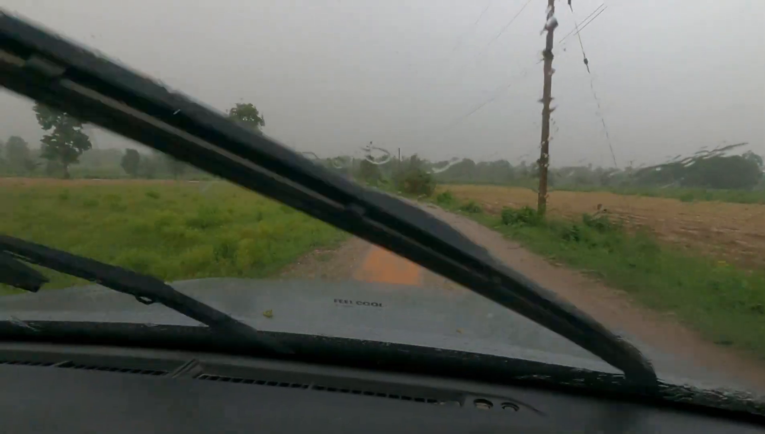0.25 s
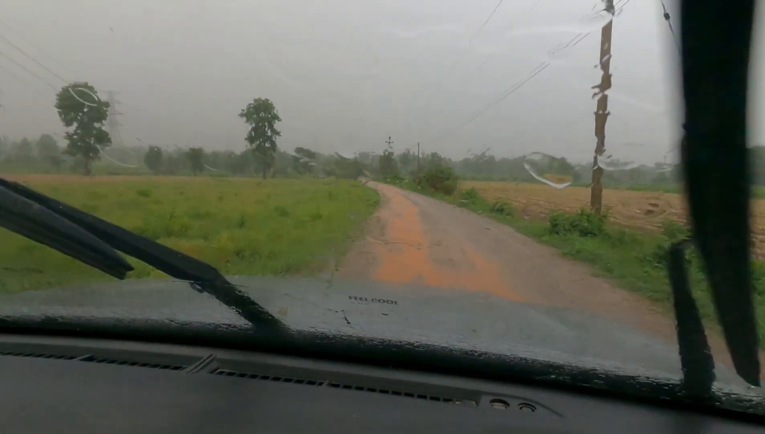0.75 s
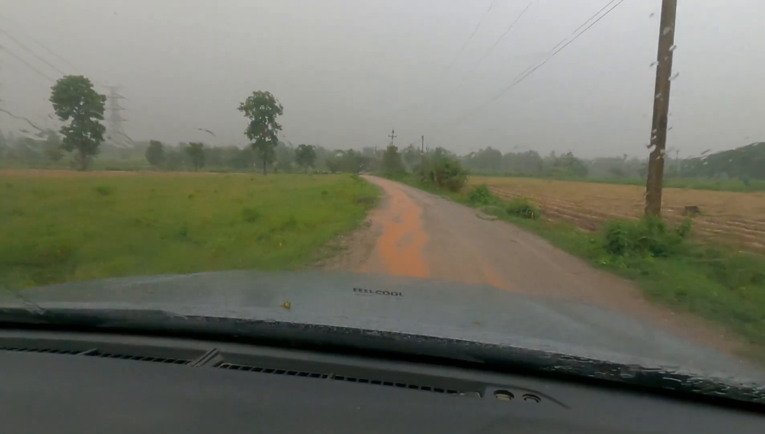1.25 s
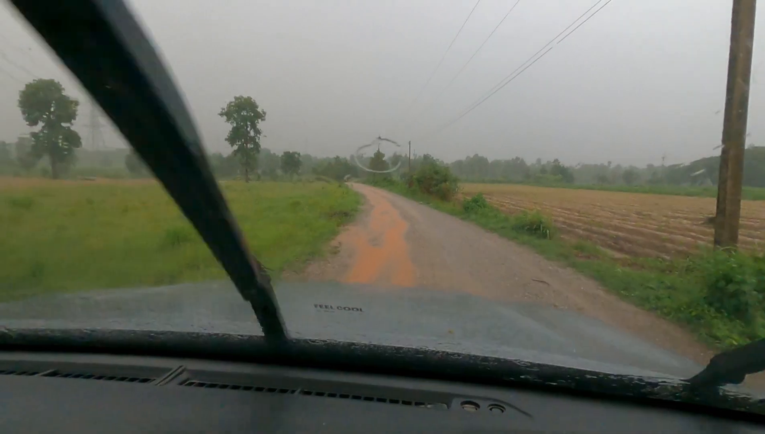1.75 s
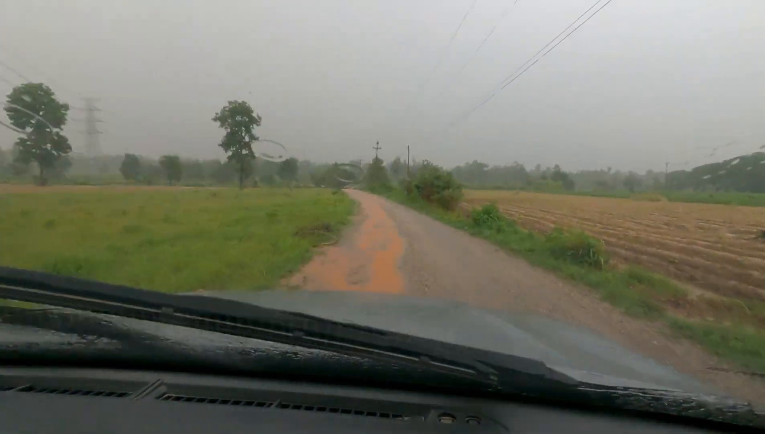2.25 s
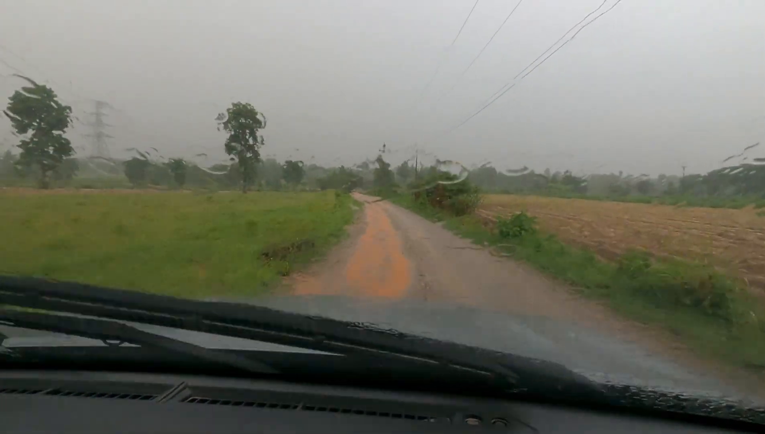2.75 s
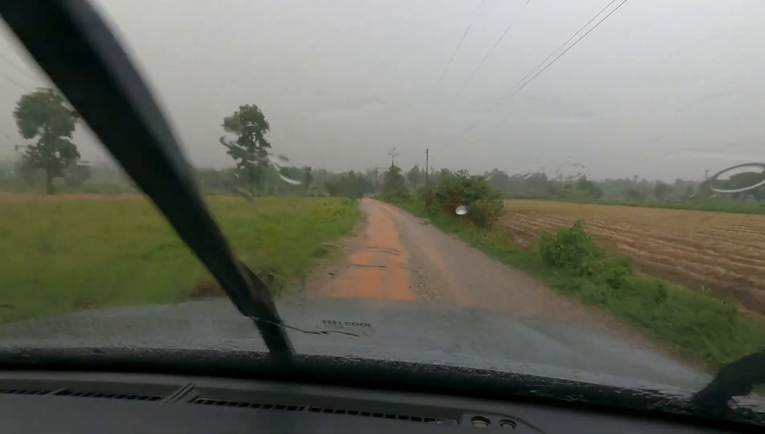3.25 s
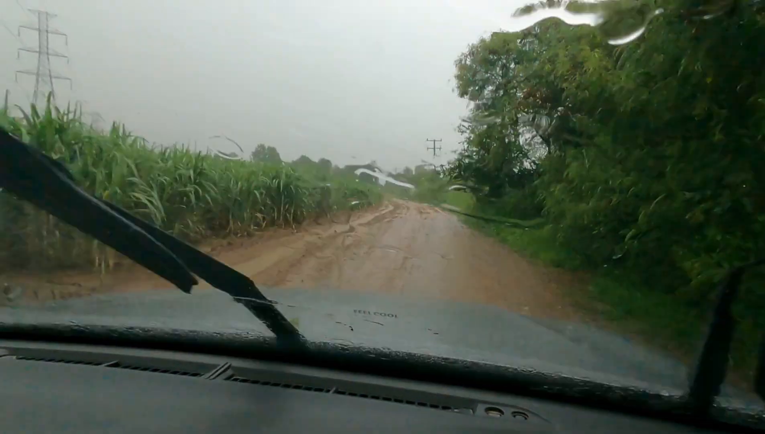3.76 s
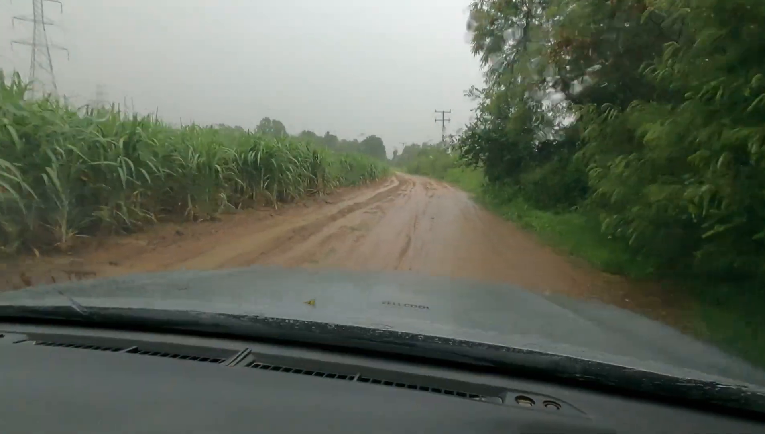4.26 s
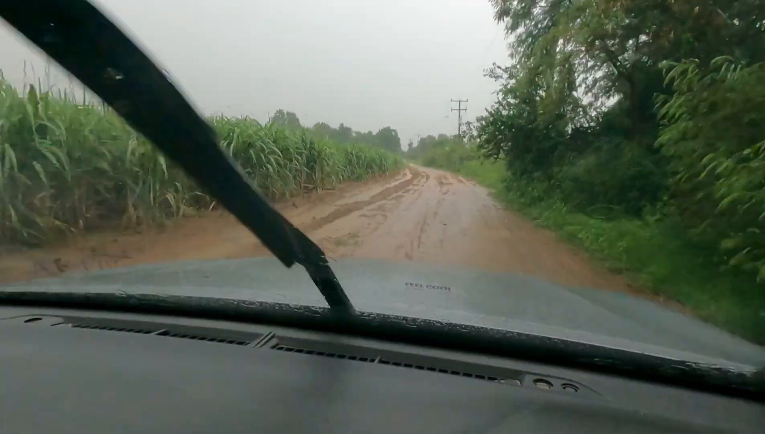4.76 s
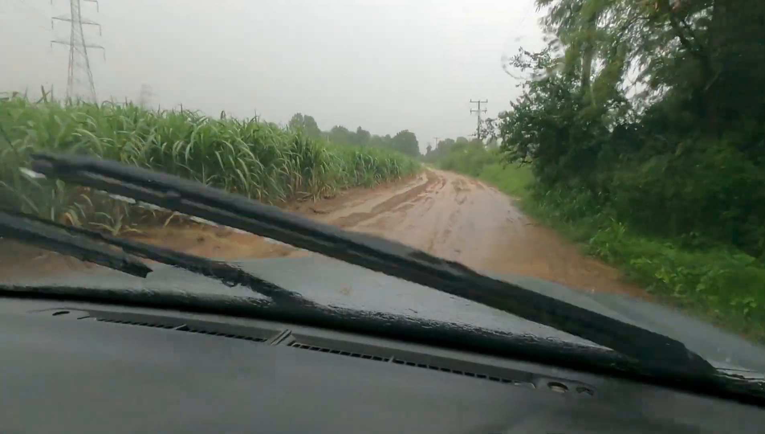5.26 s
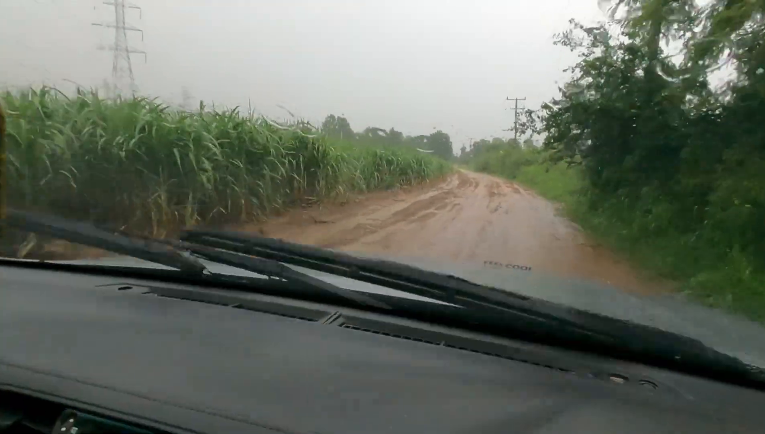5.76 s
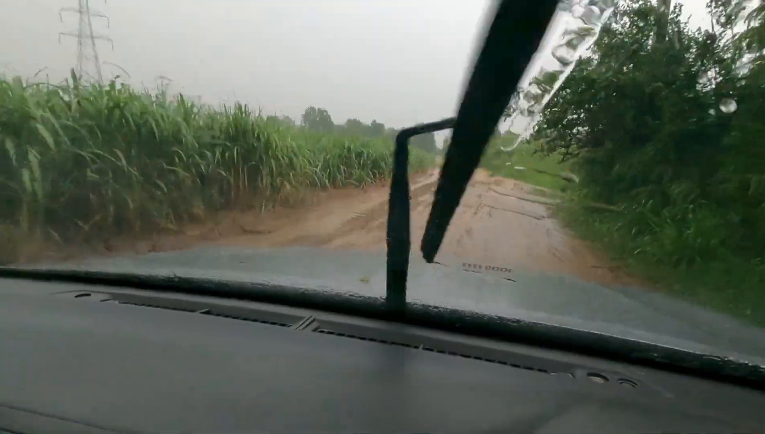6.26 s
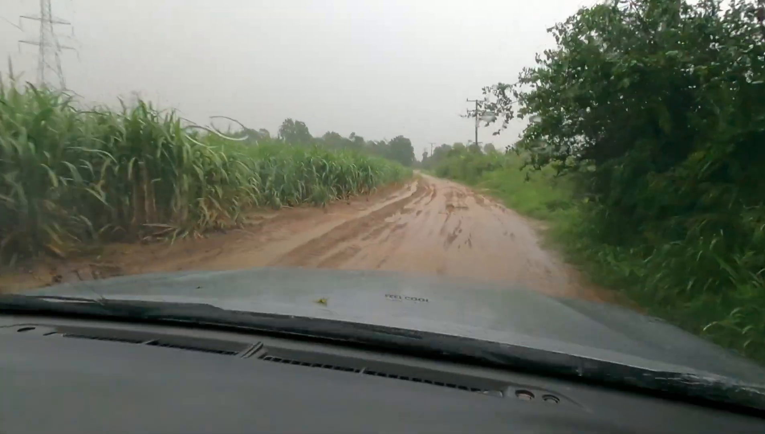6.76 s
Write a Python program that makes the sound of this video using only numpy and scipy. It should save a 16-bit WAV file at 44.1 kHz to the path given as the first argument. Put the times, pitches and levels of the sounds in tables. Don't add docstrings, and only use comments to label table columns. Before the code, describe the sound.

Inside a slowly rolling car, moderate rain hisses and ticks on the windscreen and drums dully on the lined roof. Wipers give a soft double thump at each return, and ruts make low cabin booms. The sound cuts to near silence, with one tiny scrap, then fades quickly into a heavier, brighter downpour with big drops cracking on glass and the engine pulling, before easing.

```python
import sys
import numpy as np
from scipy import signal
from scipy.fft import rfft, irfft, next_fast_len
from scipy.io import wavfile

SR = 44100
rng = np.random.default_rng(int(sys.argv[2]) if len(sys.argv) > 2 else 0)


def natural_amplitude(level_db):
    exponent = np.asarray(level_db, float) / 20
    return 10 ** exponent


def master_out(mix):
    frames = np.transpose(np.atleast_2d(mix))
    ceiling = np.clip(frames, -1, 1)
    pcm = np.round(ceiling * 32767).astype(np.int16)
    wavfile.write(sys.argv[1], SR, pcm)


N = 309141
FADE_START_S = 4.012

# start_s, rain_db, slant_db (wind tips drops from windscreen to roof)
RAIN_STRENGTH = [
    [(0, -36.5, 0.5), (.12, -35, -1), (.83, -36.5, 0), (1.6, -35, -0.5), (2.0, -35, 1.5), (2.55, -35.5, 0),
     (2.78, -34, 0.5), (3.1, -35, 0), (3.7, -35.5, .5)],
    [(4.1, -28.5, 2), (4.4, -27.5, 0), (4.85, -31, 0), (5.42, -34, -.5), (5.62, -31, -1), (5.85, -31, 0.5),
     (6.17, -34, 0), (6.55, -32.5, .5), (7.01, -32.5, 0.5)],
]


def evened(x):
    return x / np.sqrt(np.mean(x ** 2) + 1e-20)


def control(rows, column):
    rows = np.array(rows)
    return np.interp(np.arange(N) / SR, rows[:, 0], rows[:, column])


def curve(scenes, column):
    before, after = (control(rows, column) for rows in scenes)
    return natural_amplitude(np.where(np.arange(N) / SR < FADE_START_S, before, after))


def swells(rows, order=2):
    t = np.arange(0, N + 64, 64) / SR
    bumps = sum(natural_amplitude(db) * np.exp(-abs(2 * (t - s) / length) ** order / 2) for s, length, db in rows)
    return np.interp(np.arange(N) / SR, t, bumps)


def gusts(fastest_hz, depth_db):
    size = next_fast_len(N, True)
    f = np.fft.rfftfreq(size, 1 / SR)
    slow = (f > 3) / (1 + (f / fastest_hz) ** 2)
    wander = irfft(rfft(rng.standard_normal(N), size) * slow, size)[:N]
    return natural_amplitude(depth_db * evened(wander))


def colour(x, points, size=4096):
    hz, db = np.transpose(points)
    f = abs(np.fft.fftfreq(size, 1 / SR))
    log_gain = np.log(natural_amplitude(np.interp(np.log(f + 1), np.log(hz), db)))
    taps = np.fft.ifft(np.exp(np.conj(signal.hilbert(log_gain)))).real
    half = size // 2
    if abs(taps[:half]).sum() <= abs(taps[half:]).sum():
        taps = np.roll(taps[::-1], 1)
    return signal.oaconvolve(x, taps[:half])[:N]


def resonate(x, hz, width):
    pole = np.exp((2j * np.pi * hz - np.pi * width) / SR)
    for _ in range(2):
        x = 2 * signal.lfilter([1 - abs(pole)], [1, -pole], x).real
    return x


def shaken_modes(modes):
    return evened(sum(natural_amplitude(db) * resonate(rng.standard_normal(N), hz, width) for hz, width, db in modes))


def drops(per_s, spread_db, snap_s, tail_s, tail_db, count=16):
    landed = rng.exponential(1, N)
    size = natural_amplitude(spread_db * np.minimum(landed, 4.2)) * (rng.random(N) < per_s / SR)
    patch = rng.integers(0, count, N)
    t = np.arange(3000) / SR
    fading = natural_amplitude(-60 * t / snap_s) + natural_amplitude(tail_db - 60 * t / tail_s)
    shapes = rng.standard_normal((count, len(t))) * fading
    return evened(sum(signal.oaconvolve(size * (patch == k), shapes[k])[:N] for k in range(count)))


def windscreen():
    # pitch_hz, level_db
    glass_tone = [
        [(500, -9), (1300, -9), (2300, -9.5), (3400, -5.5), (4400, -8.5), (5400, -15), (6400, -26.5),
         (7400, -32), (8450, -41.5), (8800, -50.5), (11000, -54), (13500, -68), (15500, -74)],
        [(500, -4.5), (1300, -2.5), (2300, -7.5), (3400, -1.5), (4400, -5), (5200, -8), (6400, -20.5),
         (7100, -30.5), (8300, -33.5), (8800, -49), (11000, -52), (13500, -62), (15500, -59)],
    ]
    ticks = drops(per_s=1400, spread_db=4.0, snap_s=0.005, tail_s=0.083, tail_db=-14.5)
    hiss = natural_amplitude(-3.0) * rng.standard_normal(N)
    patter = (ticks + hiss) * gusts(fastest_hz=25, depth_db=0.76)
    before, after = (evened(colour(patter, points)) for points in glass_tone)
    glass = np.where(np.arange(N) > FADE_START_S * SR, after, before)
    return natural_amplitude(4.0) * curve(RAIN_STRENGTH, 1) / curve(RAIN_STRENGTH, 2) * glass


def big_drops():
    # start_s, peak_db, ring_hz
    big_hits = [(0.6775, -12, 3320), (1.6307, -15, 3300), (1.957, -14, 3430), (2.2963, -10, 4000),
                (2.4064, -12, 3310), (2.4557, -15, 3460), (2.9776, -8, 3040), (3.3758, -13, 2890),
                (4.125, -7, 3510), (4.203, -5, 3660), (4.224, -4, 3540), (4.3032, -3.5, 3650),
                (4.4334, -9, 2960), (4.4708, -8.5, 2850), (4.5344, -5, 3120), (4.6309, -9, 3102),
                (4.83, -9, 2610), (4.8589, -6, 3285), (4.9246, -8, 3400), (5.263, -9, 3640),
                (5.477, -13, 3230), (5.5926, -8, 3540), (5.613, -8, 2980), (5.7154, -10, 4330),
                (5.8292, -10.5, 2550), (6.3953, -7.5, 3980), (6.539, -9, 2490), (6.868, -7.5, 3060)]
    out, t = np.zeros(N + 600), np.arange(600) / SR
    fading = natural_amplitude(-60 * t / .011) * np.minimum(t / .0003, 1)
    splash_fading = np.roll(fading, round(.0042 * SR))
    grits = rng.standard_normal((len(big_hits), 600))
    for (s, db, hz), grit in zip(big_hits, grits):
        ring = np.sin(2 * np.pi * hz * t) + .3 * grit
        splash = natural_amplitude(-1.0) * splash_fading * grit
        out[round(s * SR):][:600] += natural_amplitude(db - 6.5) * (ring * fading + splash)
    glass_points = [(800, -11), (2000, 2.0), (4800, -1.0), (6500, -14.0), (9000, -54.5), (15000, -78)]
    return colour(out[:N], glass_points)


def roof():
    # pitch_hz, level_db
    lining_tone = [(20, -42), (90, -16), (200, -2), (330, -3), (480, -1.5), (620, -5.5), (730, -4),
                   (900, -8), (1250, -7), (1450, -5), (1900, -8.5), (3000, -10), (6000, -32.5), (9000, -95)]
    drumming = drops(per_s=3500, spread_db=2.5, snap_s=0.021, tail_s=0.08, tail_db=-10.5)
    drumming = drumming * gusts(fastest_hz=15, depth_db=0.17)
    panel = evened(colour(drumming, lining_tone))
    return natural_amplitude(4.0) * curve(RAIN_STRENGTH, 1) * curve(RAIN_STRENGTH, 2) * panel


def wipers():
    # pitch_hz, level_db, t60_s
    panel_modes = [(185, -5, 0.064), (351, -3.5, 0.052), (439, 3.5, 0.027), (602, 1.5, 0.021),
                   (900, -10, 0.01)]
    # first_arm_s, second_arm_s, first_db, second_db
    arm_stops = [
        (0.8733, .8790, -11, -6.5),
        (2.192, 2.1970, -12.5, -6.5),
        (3.5090, 3.5138, -11.5, -8),
        (5.2294, 5.2333, -9, -13),
        (6.5517, 6.5553, -13, -8),
    ]
    # start_s, level_db
    single_knocks = [(0.207, -23), (.532, -30), (2.844, -30), (3.456, -31), (3.666, -21), (3.8842, -23.5),
                     (4.835, -29), (5.2378, -15), (5.824, -21), (5.972, -19), (6.5460, -11), (6.5572, -9),
                     (6.5630, -11), (6.917, -29)]
    slack_s, slack_db = .0078, -5.5
    rebound_s, rebound_db = .0160, -8.5
    first_dull, second_dull, loose_dull, knock_dull = 0.27, 0.28, 0.55, 0.61

    blows = []
    for one, two, one_db, two_db in arm_stops:
        blows.append((one - slack_s, one_db + slack_db, loose_dull))
        blows.append((one, one_db, first_dull))
        blows.append((two, two_db, second_dull))
        blows.append((two + rebound_s, two_db + rebound_db, loose_dull))
    blows += [(s, db, knock_dull) for s, db in single_knocks]

    out, t = np.zeros(N + 6000), np.arange(6000) / SR
    panel = sum(natural_amplitude(db - 60 * t / t60) * np.sin(2 * np.pi * hz * t) for hz, db, t60 in panel_modes)
    no_bass = signal.butter(2, 120, "highpass", fs=SR, output="sos")
    panel = signal.sosfilt(no_bass, panel)
    for s, db, dull in blows:
        push_s = .0008 + .0026 * np.clip(dull, 0, 1)
        push = np.hanning(round(push_s * SR) + 3)
        knock = np.convolve(panel, push)[:6000]
        out[round(s * SR) - len(push) // 2:][:6000] += natural_amplitude(db) * knock / abs(knock).max()
    return out[:N]


def engine():
    # start_s, firing_hz, load (0-1)
    engine_pull = [(0, 38, .05), (1.0, 37.4, 0.16), (2.0, 40.17, 0), (3.0, 40.12, 0.05), (3.7, 38, 0),
                   (4.1, 40, 0.7), (4.3, 40.4, 1.0), (4.6, 40.3, 0.97), (5.15, 39.9, 0.77),
                   (5.35, 38.45, .1), (6.0, 37.5, 0.1), (7.0, 39.7, 0.63)]
    turns = np.cumsum(control(engine_pull, 1) * gusts(fastest_hz=4, depth_db=0.03)) / SR
    tone = []
    for k in range(1, 5):
        order = np.sin(2 * np.pi * (k * turns + rng.random()))
        tone.append(order * gusts(fastest_hz=5, depth_db=1.0))
    load = control(engine_pull, 2)
    low = natural_amplitude(-51 + 3 * load) * (tone[0] + natural_amplitude(2.5) * tone[1])
    boom = natural_amplitude(-53 + 23 * load) * (natural_amplitude(-2.5) * tone[2] + tone[3])
    return low + boom


def cabin():
    # pitch_hz, width_hz, level_db
    boom_modes = [(124.8, 24, -3.5), (149, 45, 0)]
    # pitch_hz, width_hz, level_db
    rumble_modes = [(25.2, 14, -5), (38, 12, -6), (72, 56, -1.5)]
    # start_s, rough_db
    track = [
        [(0, -41), (.7, -42), (1.4, -41), (3.7, -45.5)],
        [(4.1, -38), (4.6, -51), (5.45, -55), (5.9, -48), (7, -44)],
    ]
    # middle_s,
    # boom_db
    cabin_shakes = [(.3, -44), (.55, -38.5), (1.2, -39), (1.57, -34.5), (2.0, -34.5), (2.3, -45), (2.85, -33),
                    (3.45, -42), (4.15, -34), (4.66, -41), (5.3, -44), (5.7, -37), (5.95, -38), (6.45, -37.5),
                    (6.88, -41)]
    shake_s, smooth_db, trim_db = 0.074, -43.5, -3.5
    boom = shaken_modes(boom_modes)
    road = shaken_modes(rumble_modes)
    rumble = signal.lfilter([1, -1], [1, -np.exp(-2 * np.pi * 12 / SR)], road)
    shake = natural_amplitude(smooth_db) + natural_amplitude(-3.0) * swells([(s, 2 * shake_s, db) for s, db in cabin_shakes])
    trim = evened(resonate(rng.standard_normal(N), hz=340, width=344)) * gusts(fastest_hz=12, depth_db=2.5)
    return shake * (boom + natural_amplitude(trim_db) * trim) + natural_amplitude(0.9) * curve(track, 1) * rumble


def spray():
    # middle_s, length_s, level_db
    seal_squirts = [
        (1.225, .03, -80),
        (1.82, .05, -74),
        (1.99, .11, -74),
        (2.3, .015, -72),
        (2.405, .05, -69),
        (2.84, .04, -80),
        (5.0, .06, -79),
        (7.01, .02, -73),
    ]
    seal_db, flicker_db = -84.5, 2.5
    dry_db, wet_db, wets_s, after_db = -68, -54, 1.3, -70
    fizz = evened(resonate(rng.standard_normal(N), hz=11000, width=1900))
    fine = drops(per_s=1500, spread_db=4.5, snap_s=0.0055, tail_s=.04, tail_db=-21.0, count=4)
    sheen_points = [(5500, -57.5), (6500, -0.5), (7200, 1.5), (7900, -7), (8500, -20.0), (8800, -59)]
    sheen = evened(colour(fine, sheen_points))
    t = np.arange(N) / SR
    wetting_db = wet_db + (dry_db - wet_db) * np.exp(-t / wets_s)
    sheen_db = np.where(t < FADE_START_S, wetting_db, after_db)
    leak = natural_amplitude(seal_db) * gusts(fastest_hz=20, depth_db=flicker_db) + swells(seal_squirts, order=4)
    return leak * fizz + natural_amplitude(sheen_db) * sheen


def scene():
    air = windscreen() + big_drops() + roof() + cabin() + spray() + wipers() + engine()
    return signal.sosfilt(signal.butter(1, 8, "highpass", fs=SR, output="sos"), air)[None]


def top_cut(x):
    return signal.sosfilt(signal.butter(12, 15500, fs=SR, output="sos"), x)


def record(dry):
    # start_s, peak_db
    slip_ticks = [(.1266, -50), (.9268, -52), (1.1268, -50), (1.7265, -50), (1.9265, -55), (2.1266, -50),
                  (2.3266, -42), (2.9268, -57), (3.1268, -55), (3.5269, -54), (3.8847, -31), (4.1669, -45),
                  (4.3665, -44), (4.9666, -45), (5.7668, -45), (5.9668, -46), (6.3669, -50), (6.7665, -45)]
    cut_s, scrap_start_s, scrap_end_s, fade_end_s = 3.7265, 3.8847, 3.8911, 4.085
    t, slips = np.arange(N) / SR, np.zeros(N)
    for s, db in slip_ticks:
        slips[round(s * SR)] = natural_amplitude(db + 5)
    fade = np.clip((t - FADE_START_S) / (fade_end_s - FADE_START_S), 0, 1) ** 1.68
    scrap = natural_amplitude(0.5) * (t > scrap_start_s) * np.clip((scrap_end_s - t) / 0.00053, 0, 1)
    mix = dry * ((t < cut_s) + scrap + fade) + slips
    treble_limit = signal.firwin(301, 15450, window=("kaiser", 9), fs=SR)
    mix = signal.oaconvolve(mix, treble_limit[None], "same")
    return top_cut(mix)


dry = scene()
out = record(dry)
master_out(out)
```